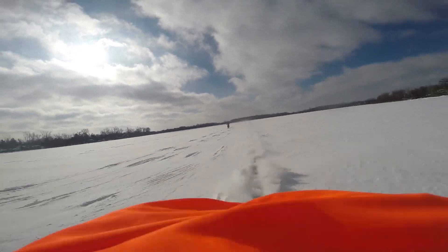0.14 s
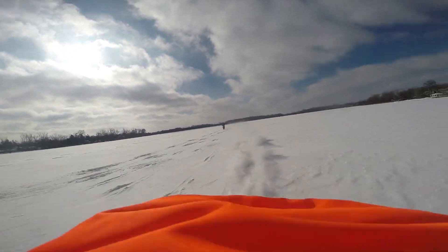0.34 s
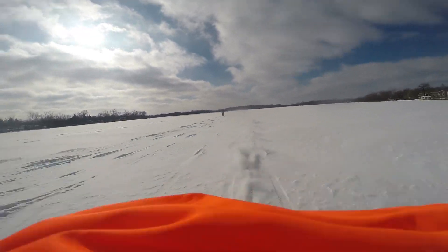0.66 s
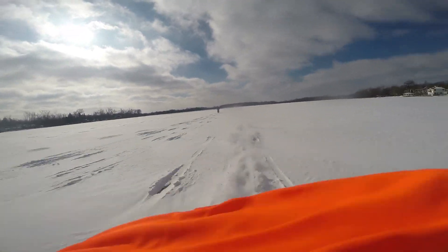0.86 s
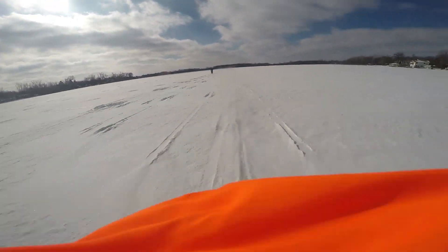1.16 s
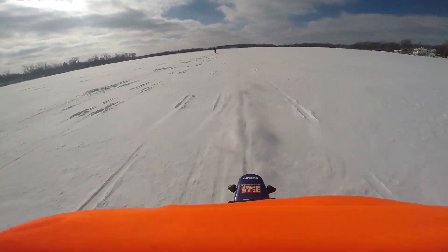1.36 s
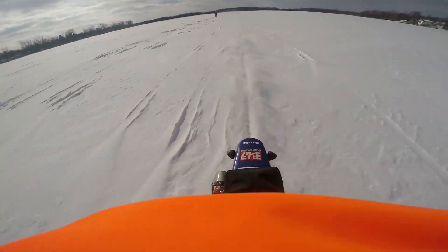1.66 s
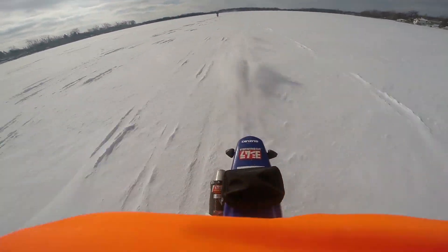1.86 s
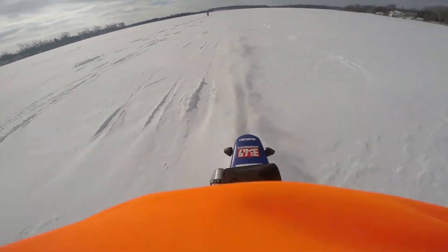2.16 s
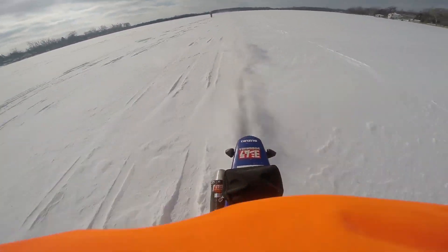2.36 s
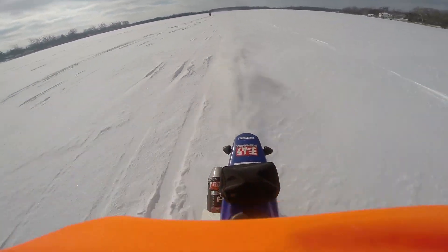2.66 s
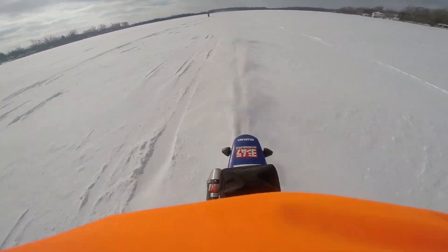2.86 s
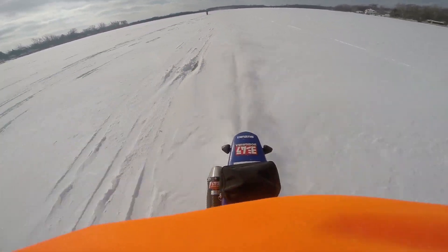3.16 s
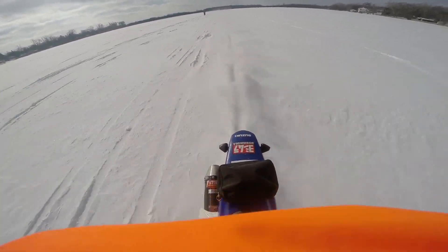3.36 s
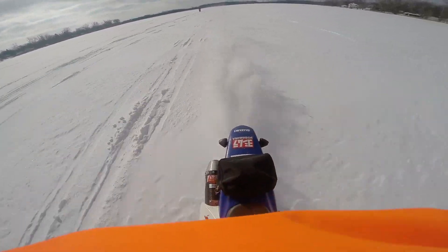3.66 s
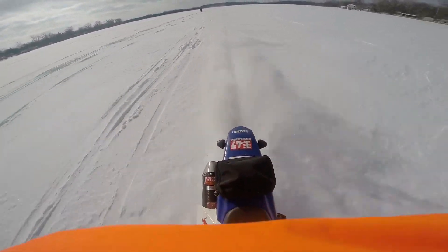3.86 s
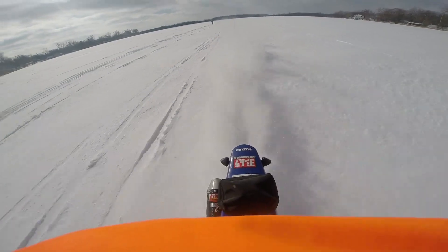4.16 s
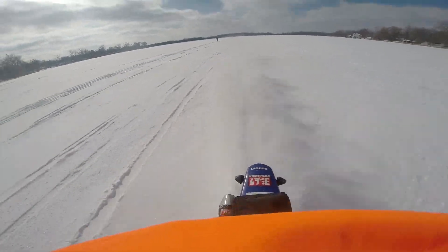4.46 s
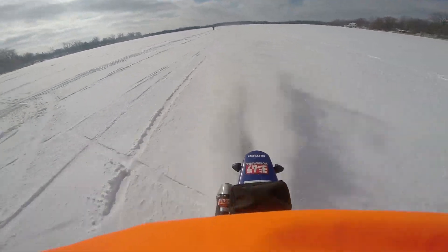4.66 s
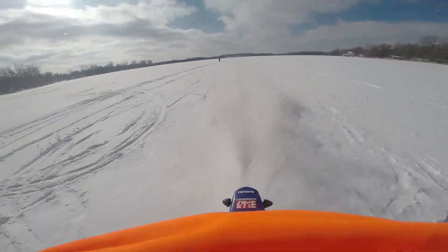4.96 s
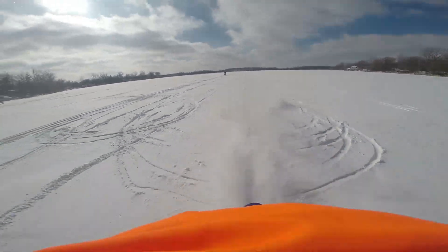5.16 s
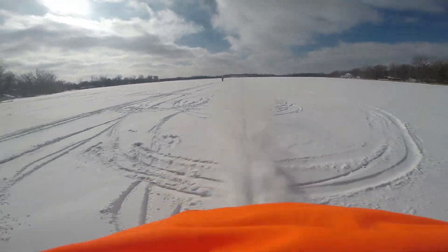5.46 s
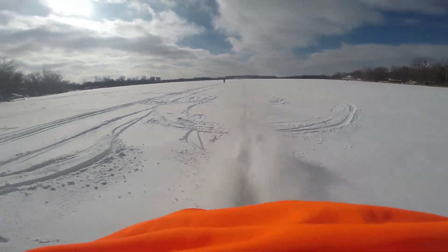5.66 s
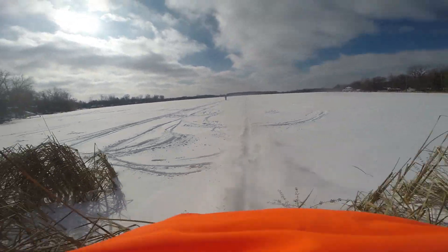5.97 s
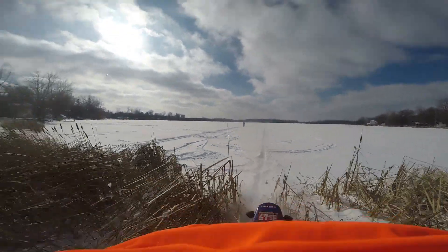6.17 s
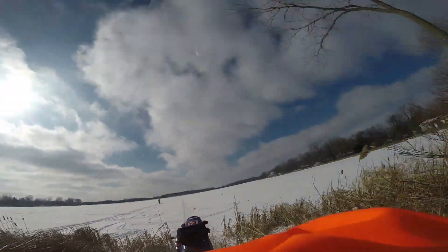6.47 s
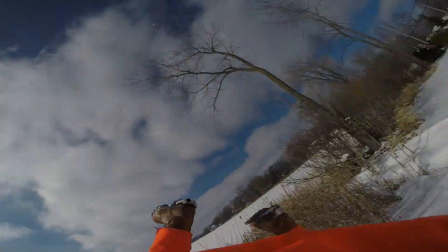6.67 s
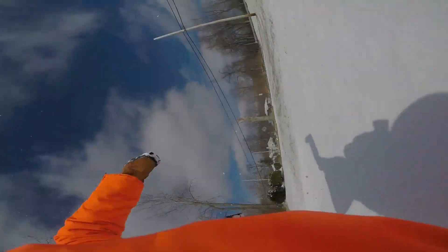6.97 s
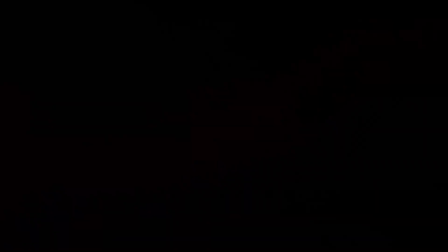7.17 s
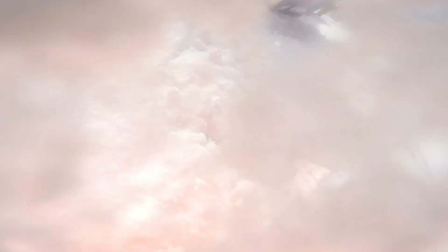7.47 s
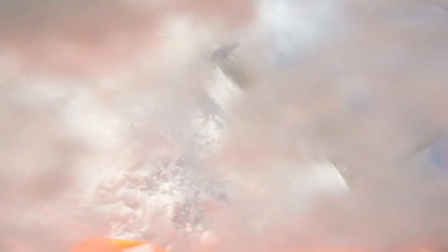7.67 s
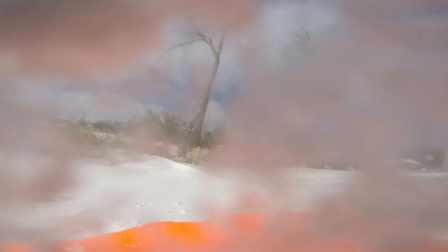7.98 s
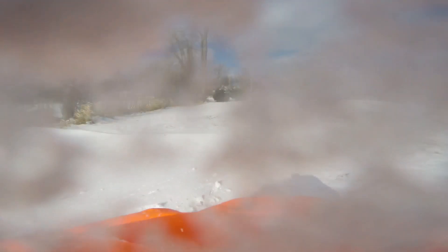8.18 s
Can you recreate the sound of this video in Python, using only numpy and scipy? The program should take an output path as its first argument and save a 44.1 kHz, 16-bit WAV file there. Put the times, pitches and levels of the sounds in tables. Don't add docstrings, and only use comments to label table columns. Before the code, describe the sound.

A small camera in a sealed plastic housing on a motorcyclist's back crosses a frozen lake. Loud low wind buffeting, jacket slaps and rubbing come first, then hollow plastic knocks. Wind fades as the bike slows, leaving cloth crunches and rumble. A muffled engine rev climbs briefly, then sharp clattering blows and a gritty snow scrape mark the fall, followed by quiet rustles and ticks.

```python
import sys
import numpy as np
from scipy import signal
from scipy.fft import rfft, irfft, next_fast_len
from scipy.io import wavfile

SR = 44100
rng = np.random.default_rng(int(sys.argv[2]) if len(sys.argv) > 2 else 0)


def dump_mix(stems):
    frames = np.atleast_2d(stems).T
    limited = np.clip(frames, -1, 1)
    pcm = np.round(limited * 32767).astype(np.int16)
    wavfile.write(sys.argv[1], SR, pcm)


def elevation(decibels):
    levels = np.asarray(decibels, float)
    return 10 ** (levels / 20)


N = 367217

# time_s, level_db
WIND = [(0.0, -20.5), (0.68, -16.5), (1.12, -21), (1.5, -13), (1.77, -20), (2.3, -14.5), (3.1, -17),
        (3.3, -19), (3.6, -26), (3.78, -28.5), (4.4, -34), (5.1, -36.5), (6.0, -43), (6.3, -28.5),
        (6.5, -43), (6.95, -40), (7.9, -61.5), (8.33, -54)]
# time_s, share
AIRSPEED = [
    (0, 1),
    (3.5, 0.92),
    (4.0, 0.45),
    (6.3, 0.79),
    (6.5, 0.04),
    (8.33, 0.72),
]
# frequency_hz, density_db (per Hz)
HEAVE = [(4.7, -42), (8.0, -4), (32, 2.5), (44, -9), (64, -18.5), (90, -17.5), (120, -53.5), (200, -120)]
# frequency_hz, density_db (per Hz)
BUFFET = [(24, -35), (40, -0.5), (139, 0.5), (165, 0), (258, -22), (300, -19), (390, -20.5), (660, -120)]
# frequency_hz, density_db (per Hz)
ROAR = [(180, 1), (240, 7), (300, 6), (380, 3), (480, -5.5), (600, -39)]
# mode_hz, width_hz, level_db
MOUNT = [(140, 110, 1.5), (238, 280, -8.5), (290, 105, 9.5), (352, 120, 3)]
# mode_hz, width_hz, level_db
HOLLOW = [(496, 99, 9.5), (800, 92, -17), (996, 250, 1), (850, 820, 4)]
# offset_db, slope (dB per wind dB), slope (dB per rub dB)
HEAVE_LAW = (-13, 0.52, 0.081)
ROAR_LAW = (-8.5, 0.42, 0.46)
HAZE_LAW = (-15, 0.43, 0.48)
# middle_s, length_s, level_db
SWAYS = [(3.5, 0.16, -25), (3.73, 0.17, -30), (4.06, 0.39, -29), (4.81, 0.52, -26), (5.15, 0.74, -32),
         (5.66, 0.54, -29), (6.12, 0.44, -26.5), (6.48, 0.17, -32.5), (6.95, 0.23, -28.5),
         (7.45, 0.17, -25.5), (7.65, 0.18, -36), (8.2, 0.3, -31.5)]
# middle_s, length_s, level_db, hum_db and boom_db relative to it
THUDS = [(1.23, 0.12, -31, -12, -24), (1.56, 0.15, -33.5, 5.5, -76), (3.6, 0.19, -42.5, -11, 12),
         (4.1, 0.84, -42.5, -5, -2), (4.7, 1, -54.5, -6, 3), (3.05, 0.4, -24.5, -18, -22),
         (5.46, 0.037, -39, 7, -2), (6.3, 0.2, -51, 18, 5), (6.42, 0.047, -27, 5, -9),
         (6.72, 0.049, -42.5, 11.5, -28), (7.03, 0.13, -28.5, 2, -32), (7.1, 0.081, -38, 10.5, -14),
         (7.27, 0.17, -29, -5.5, -8.5), (7.45, 0.15, -30.5, -6.5, -14), (7.65, 0.13, -52.5, -2, -60),
         (8.15, 0.42, -50, 4.5, -18)]
# start_s, peak_db, pitch_hz
JOLTS = [(0.028, 3, 134), (0.092, -1, 112), (0.585, 3.5, 76), (0.709, 4, 130), (0.915, 2.5, 147),
         (0.967, 0, 145), (1.497, 6, 120), (1.754, 6.5, 131.5), (1.799, -0.5, 133), (1.846, 0.5, 140),
         (1.956, 0, 142), (2.188, -3, 135), (2.388, 3, 156), (2.515, -1.5, 178), (2.625, -20, 109),
         (2.699, 4, 140), (3.323, -6, 140), (3.411, -2, 135), (3.509, 0.5, 133), (3.722, -6, 140),
         (5.094, -16, 123), (5.455, -14.5, 140), (6.206, -7, 95), (6.405, -13, 101), (7.028, -11, 264),
         (7.044, -20, 300), (7.09, -22, 328), (7.115, -14, 290), (7.451, -21, 186), (7.149, -7, 151),
         (7.239, -36, 111), (7.435, -14.5, 71.6), (7.621, -25, 125), (8.114, -18.5, 118)]
# middle_s, pressure (share of full scale), width_s
SHOVES = [
    (5.023, -0.19, 0.0033),
    (5.155, -0.36, 0.0041),
    (5.17, 0.2, 0.011),
    (8.153, 0.073, 0.0044),
    (8.219, 0.077, 0.013),
]
# start_s, peak_db, length_s
FLAPS = [(0.004, -10.5, 0.027), (0.1082, -21, 0.038), (0.183, -14, 0.023), (0.247, -38, 0.026),
         (0.255, -19, 0.024), (0.284, -26, 0.13), (0.385, -18, 0.04), (0.4509, -24, 0.04),
         (0.48, -18, 0.034), (0.546, -24, 0.027), (0.558, -14, 0.026), (0.667, -8, 0.041),
         (0.707, -13, 0.026), (0.732, -15, 0.04), (0.752, -19, 0.06), (0.827, -20, 0.029),
         (0.861, -16, 0.019), (0.895, -10.5, 0.049), (0.924, -28, 0.028), (0.977, -9, 0.072),
         (1.037, -16.5, 0.16), (1.142, -10, 0.029), (1.202, -7.5, 0.026), (1.246, -12.5, 0.03),
         (1.299, -14, 0.036), (1.314, -15, 0.024), (1.353, -9, 0.021), (1.404, -11.5, 0.033),
         (1.424, -13.5, 0.022), (1.448, -9, 0.016), (1.47, -30, 0.028), (1.49, -15, 0.045),
         (1.524, -26, 0.027), (1.56, -13.5, 0.059)]
# time_s, level_db
RUB = [(0.0, -26.5), (0.8, -20.5), (1.2, -29.5), (1.58, -41.5), (1.66, -46), (2.1, -41.5), (2.28, -39),
       (2.5, -43), (3.93, -44), (4.02, -47), (4.63, -51), (5.22, -43), (5.3, -48), (6.0, -50), (6.55, -49),
       (7.1, -43.5), (7.55, -55), (8.33, -54.5)]
# frequency_hz, density_db (per Hz)
CAVITY = [(700, -13), (800, -9), (1180, -3), (1300, -0.5), (1410, 1.5), (1800, -0.5), (2180, 4),
          (2400, -0.5), (3300, -9), (4200, -27), (5000, -64)]
# frequency_hz, density_db (per Hz)
CRISP = [(2470, -9.5), (4200, -7), (4650, -2.5), (5140, -8), (5910, -0.5), (7860, -14), (9890, -14.5),
         (12800, -20), (15200, -32), (15700, -65), (16000, -99)]
# offset_db above the cavity, slope (dB per rub dB)
CRISP_LAW = (-21.5, -0.21)
# mode_hz, width_hz, level_db
RUB_LATCH = [(1560, 300, 0), (2200, 200, 6)]
# middle_s, length_s, level_db, crispness_db
STROKES = [(2.74, 0.51, -50, -16), (3.34, 0.16, -44, -12), (3.47, 0.069, -33, -35),
           (3.565, 0.064, -41.5, -10.5), (3.62, 0.15, -46, 3), (5.98, 0.2, -58, 9), (5.0, 0.67, -76, 21),
           (5.76, 0.24, -67, 0), (6.16, 0.44, -38.5, -6.5), (6.29, 0.19, -44, -8.5), (6.36, 0.2, -44.5, -6),
           (7.27, 0.21, -29, -7), (7.44, 0.23, -43, -3.5), (7.64, 0.28, -69, -7), (8.05, 0.15, -45, -9),
           (8.125, 0.093, -36, -7), (8.19, 0.064, -40, -8.5), (8.24, 0.076, -57, -5),
           (3.73, 0.057, -38.5, -13.5)]
# start_s, length_s, level_db, crispness_db
SLIDES = [(6.397, 0.037, -28.5, -20),(7.001, 0.058, -35, -14), (7.189, 0.014, -19, -1.5),
          (7.2, 0.0082, -10, -5), (7.201, 0.025, -26, -9), (7.231, 0.069, -23.5, -9.5),
          (7.282, 0.052, -31.5, -27), (6.256, 0.043, -39, -33), (7.076, 0.061, -37.5, -18),
          (6.313, 0.029, -51, -18), (6.407, 0.0056, -33, -23), (7.395, 0.09, -42, 1),
          (7.607, 0.035, -46, -6)]
# start_s, peak_db, centre_hz, length_s
CRUNCHES = [(2.552, -23, 1550, 0.037), (2.612, -29, 1350, 0.088), (2.708, -22.5, 1660, 0.044),
            (2.815, -27, 2260, 0.068), (2.841, -34, 1390, 0.033), (2.991, -37, 800, 0.023),
            (3.036, -26, 910, 0.027), (3.193, -21, 1380, 0.046), (3.23, -38, 1560, 0.02),
            (3.343, -40, 1750, 0.058), (3.355, -25.5, 1450, 0.027), (3.446, -25.5, 1400, 0.052),
            (3.074, -32, 1070, 0.043), (3.554, -35, 640, .022), (3.589, -26, 520, 0.019),
            (3.619, -30, 600, .03), (3.815, -22, 1400, 0.026), (3.866, -23, 1370, 0.034),
            (3.937, -20.5, 1340, 0.018), (3.9594, -24, 1550, 0.033), (4.859, -28.5, 2230, 0.022),
            (4.923, -22, 1820, 0.019), (4.983, -27, 2200, 0.015), (5.045, -25.5, 2060, 0.036),
            (5.112, -21, 2230, 0.037), (5.187, -30, 1910, 0.024), (5.24, -28, 1710, 0.033)]
# start_s, peak_db, crack_db
KNOCKS = [(0.6753, -19, -31), (0.8977, -27, -11), (1.1946, -12, -37), (1.2509, -15, -39),
          (1.4274, -18, -34), (1.4526, -18, -36), (1.472, -15, -24), (1.562, -9.5, -44), (1.577, -15, -45),
          (1.622, -14.5, -64), (1.669, -14, -50), (1.714, -10.5, -53), (1.7824, -12, -22.5),
          (1.8222, -14.5, -46), (1.8696, -9.5, -53), (1.9336, -14.5, -22), (1.9757, -7, -29),
          (2.0932, -6, -51), (2.122, -26, -44), (2.256, -7.5, -18), (2.2892, -14, -48), (2.3093, -9.5, -25),
          (2.4162, -10, -22), (2.447, -22, -51), (3.688, -31, -27), (5.125, -11.5, -26), (5.1806, -23, -30),
          (5.3374, -22.5, -30.5), (5.7388, -27.5, -51)]
# start_s, peak_db, loudest_mode_hz, crack_db, frame_ring_db
BLOWS = [(0.937, -7, 1130, -38, -6), (6.119, -17, 2000, -56, -12), (6.156, -19, 1630, -44, 9),
         (6.2146, -9, 1740, -36, 6.5), (6.315, 0.5, 1420, -22, -5), (6.36, -24, 1550, -54, -6),
         (6.4152, 1.5, 1946, -34, -4.5), (6.4151, -1.5, 3220, -47, -22), (6.465, -25, 2280, -45, -3),
         (6.7058, -6.5, 2030, -37, -5.5), (6.7164, -8.5, 1880, -38, -12.5), (6.985, -9, 1740, -34, -27),
         (7.038, 1.5, 2144, -25, -4.5), (7.109, -15.5, 2200, -46, 2), (7.1553, 5, 2220, -19, -9.5),
         (7.2033, 4.5, 2510, -1, -6.5), (7.4356, -6.5, 2740, -31, -23), (7.435, -1.5, 1940, -43, -11.5),
         (7.633, -18, 2340, -33, -10.5), (8.1126, -22.5, 2120, -38, -1), (8.128, -16.5, 2060, -36, -7),
         (8.179, -26, 1790, -72, -19)]
# start_s, peak_db
TICKS = [(2.485, -42), (2.512, -47), (3.13, -42), (3.831, -46), (4.03, -35), (4.973, -34), (5.3202, -38),
         (5.3487, -24.5), (5.447, -33), (5.75, -28.5), (5.795, -39), (5.811, -28.5), (5.844, -38),
         (6.2687, -38), (6.777, -39), (7.101, -30), (7.166, -30), (7.46, -36), (7.5289, -30), (7.55, -38),
         (7.809, -38), (7.886, -30.5)]
# mode_hz, width_hz, level_db
SHELL = [(1220, 610, -0.5), (1550, 220, 10.5), (2236, 310, 10.5), (3350, 240, 1), (3240, 2200, -5)]
# mode_hz, level_db, t60_s
FRAME = [(315, 17, 0.034), (417, 1, 0.048), (809, -0.5, 0.053), (1000, -4, 0.041), (1223, -7, 0.066),
         (1550, 1, 0.05), (2000, -5, .08)]
# mode_hz, level_db under the hit, t60_s
LATCH = [(2169, -20, .12), (2240, -31, .05)]
# mode_hz, level_db under the blow, t60_s
LENS = [(3056, -12.5, 0.012), (4670, -24.5, 0.0089), (6300, -19, 0.0068)]
# time_s, rate_hz (firings per second)
REVS = [
    (5.657, 14),
    (5.822, 17.2),
    (5.982, 27.5),
    (6.175, 43.4),
    (6.4, 48),
]
# time_s, peak_db, tuning (factor)
THROTTLE = [
    (5.655, -31, 0.84),
    (5.8, -25.5, 0.9),
    (5.9, -18.5, 0.85),
    (6.0, -21, 1.07),
    (6.13, -16.5, 1.02),
    (6.29, -23.5, 0.96),
    (6.4, -36, 1.7),
]
# mode_hz, level_db, t60_s
PIPE = [(135, 9, 0.035), (267, 18.5, 0.034), (415, 14, 0.036), (500, 6, .035), (776, -14, 0.027)]
# start_s, peak_db, centre_hz
PRICKS = [(3.76, -46, 5780), (4.5545, -51, 5980), (4.5895, -47, 6440), (5.314, -35.5, 6150),
          (6.3324, -42, 6150), (6.5026, -58, 5810), (6.559, -48, 5850), (6.595, -53, 5370),
          (6.6423, -55, 6320), (6.6727, -54, 5690), (7.3975, -32, 5520), (7.5634, -48, 5500),
          (7.6214, -46, 5730), (7.8466, -48, 6440), (8.109, -36, 5900),
          (2.9417, -52, 9260), (4.6728, -52, 10100), (4.8554, -55, 11600), (4.8673, -42, 10300),
               (5.009, -44, 11400), (5.2699, -48, 10100), (5.4156, -56, 9270), (5.7379, -44, 12900),
               (5.8082, -36, 11500), (5.8426, -47, 9340), (6.3759, -45, 9280), (7.664, -50, 9560),
               (7.9853, -53, 9900), (8.0072, -48, 9670), (8.0815, -55, 9380), (8.1723, -47, 9910),
               (8.298, -55, 12000)]


def wind():
    wind_db, rub_db = curve(WIND), curve(RUB)
    heaving, roaring, hazing = (elevation(offset_db + per_wind * wind_db + per_rub * rub_db)
                                for offset_db, per_wind, per_rub in (HEAVE_LAW, ROAR_LAW, HAZE_LAW))
    thud, thud_hum, thud_boom = swells(THUDS)
    speed = np.clip(curve(AIRSPEED), 0, 1)
    gusts = lumps(hz=25.2, depth_db=2.0)
    noise = evened(rng.standard_normal(N) * gusts)
    pulses = evened(sparse(per_s=130, spread_db=2.5) * gusts)
    eddies = (0.56 * noise - 0.75 * speed * pulses) / np.hypot(0.6, 0.53 * speed)

    heave = coloured(rng.standard_normal(N), HEAVE)
    buffet = coloured(eddies, BUFFET)
    hum = evened(low_pass(ring(noise, MOUNT), hz=500))
    fast_roar = coloured(eddies * lumps(hz=56.7, depth_db=-3.0), ROAR)
    roar = np.sqrt(speed) * fast_roar + np.sqrt(1 - speed) * hum
    haze = evened(low_pass(ring(noise * lumps(hz=70.5, depth_db=2.0), HOLLOW), hz=1160))
    low = (heaving + swells(SWAYS)[0]) * heave + (elevation(wind_db - 1.0) + thud) * buffet
    return low + (roaring + thud_hum) * roar + (hazing + thud_boom) * haze


def jolts():
    out, t = np.zeros(N), np.arange(8000) / SR
    shape = (1 - np.exp(-t / 0.0051)) * elevation(-60 * t / 0.052)
    for s, peak_db, hz in JOLTS:
        add(out, s, peaked(-shape * np.sin(2 * np.pi * hz * t), peak_db - 8.5))
    clock = np.arange(N) / SR
    for s, push, width in SHOVES:
        out += push * np.exp(-0.5 * ((clock - s) / width) ** 2)
    return out


def slaps(body, crisp):
    gain, t = np.zeros(N), np.arange(4000) / SR
    rise_s, level_db, crisp_db = 0.0007, -13.5, -14
    for s, peak_db, length in FLAPS:
        decay = elevation(peak_db + level_db - 20 * t / length)
        add(gain, s - rise_s, np.minimum(t / rise_s, 1) * decay)
    return gain * (body + elevation(crisp_db) * crisp)


def rustle(body, crisp):
    steady_db, speed = curve(RUB), curve(AIRSPEED)
    stroke, stroke_crisp = swells(STROKES)
    rub = elevation(steady_db) + stroke
    offset_db, per_rub = CRISP_LAW
    thin = elevation(steady_db + offset_db + per_rub * steady_db) + stroke_crisp
    rub_db, crisp_db = 20 * np.log10(rub), 20 * np.log10(thin / rub)

    loose = np.clip((-22 - rub_db) / 16, 0.2, 1)
    latch_ring = 0.8 * loose ** 2 * evened(ring(body, RUB_LATCH))
    flap = lumps(hz=24.2, depth_db=6.0) * lumps(hz=156, depth_db=-4.5)
    flap = flap ** (loose * (0.5 + 0.5 * speed))
    flapping_body = body * flap ** 0.83
    flapping_crisp = crisp * flap ** 0.51 * lumps(hz=40.7, depth_db=2.5)

    bright = elevation(np.clip(0.5 * (rub_db + crisp_db + 40), -16, 0))
    soft = low_pass(flapping_crisp, hz=6900)
    treble = elevation(crisp_db + 2.5) * (bright * flapping_crisp + (1 - bright) * soft)
    out = elevation(rub_db - 0.78) * (0.71 * flapping_body + latch_ring * flap ** 0.036 + treble)

    for s, length, db, slide_crisp_db in SLIDES:
        at = slice(round(s * SR), round((s + length) * SR))
        scrape = body[at] + elevation(slide_crisp_db) * crisp[at]
        out[at] += elevation(db) * scrape * signal.windows.tukey(len(out[at]), 0.35)
    for s, peak_db, hz, length in CRUNCHES:
        part = flapping_body[round(s * SR):][:round(length * SR)]
        fold = evened(ring(rng.standard_normal(len(part)), [(hz, 0.28 * hz, 0), (3300, 600, -12)]))
        crackle = part + 0.34 * soft[round(s * SR):][:len(part)]
        crunch = min(hz / 1500, 1) ** 2 * crackle + low_pass(fold, hz=4500)
        add(out, s - 0.002, peaked(crunch * signal.windows.tukey(len(part), 0.4), peak_db - 1.5))

    hiss = coloured(rng.standard_normal(N) * lumps(hz=30, depth_db=1.5), CRISP)
    blown = low_pass(low_pass(hiss, hz=7200), hz=7200)
    return out + elevation(-63) * hiss + elevation(-45.5 + 0.47 * curve(WIND)) * speed * blown


def friction():
    clicks = sparse(per_s=1500, spread_db=6) * rng.choice([-1, 1], N)
    grit = evened(rng.standard_normal(N)) + 0.58 * evened(clicks)
    body, fold = coloured(grit, CAVITY), lumps(hz=14.2, depth_db=2.5)
    low = signal.sosfiltfilt(signal.butter(N=3, Wn=1800, fs=SR, output="sos"), body)
    return evened(low * fold + (body - low) / fold), coloured(grit, CRISP)


def knocks():
    out, t = np.zeros(N), np.arange(4000) / SR
    for (s, peak_db, crack_db), z in zip(KNOCKS, rng.standard_normal((len(KNOCKS), 4000))):
        shell = [(hz * (1 + 0.04 * a), width, db + 2.5 * b)
                 for (hz, width, db), a, b in zip(SHELL, z[3:], z[9:])]
        lens = np.minimum(t / 0.001, 1) * struck(LENS, t, 1 + 0.03 * z[2])
        knock = hit(z, peak_db, crack_db, 0.018, shell, -6)
        add(out, s - 0.0005, knock + elevation(peak_db - 3 + 4 * z[1]) * lens)

    for (s, peak_db, hz, crack_db, frame_db), z in zip(BLOWS, rng.standard_normal((len(BLOWS), 4000))):
        off_db = -16 * abs(np.log2(hz / 2200))
        frame_modes = [(f, db + 3 * a, t60) for (f, db, t60), a in zip(FRAME, z[3:])]
        frame = peaked(np.minimum(t / 0.0012, 1) * struck(frame_modes, t), peak_db + frame_db - 5.0)
        lens = elevation(peak_db) * np.minimum(t / 0.0024, 1) * struck(LENS, t)
        shell = [(f, width, db - 16.0 + off_db) for f, width, db in SHELL] + [(hz, 0.24 * hz, 12)]
        grind_s = 0.06 * elevation(0.2 * crack_db)
        add(out, s - 0.0005, hit(z, peak_db, crack_db, grind_s, shell, off_db - 1) + frame + lens)

    for (s, peak_db), z in zip(TICKS, rng.standard_normal((len(TICKS), 400))):
        add(out, s, peaked(coloured(z * elevation(-60 * t[:400] / 0.0087), CRISP), peak_db))
    return out


def hit(z, peak_db, crack_db, t60, modes, latch_db=0):
    t = np.arange(len(z)) / SR
    loudest_hz = max(modes, key=lambda mode: mode[2])[0]
    grind = 0.2 * z * elevation(-60 * t / max(t60, 0.002))
    first_touch = 2 * (t == 0)
    full_contact = 2.5 * (abs(t - 1.5 / loudest_hz) < 0.5 / SR)
    blow = grind + first_touch - full_contact
    push = np.convolve(blow, np.hanning(9))[:len(z)]
    crack = coloured(blow * elevation(-60 * t / 0.02), CRISP)
    shell = peaked(low_pass(ring(push, modes), hz=5250), 0)
    latch = elevation(latch_db + 2 * z[0]) * struck(LATCH, t)
    return elevation(peak_db - 2.0) * (shell + latch) + peaked(crack, crack_db - 0.5)


def engine():
    out, t = np.zeros(N), np.arange(3000) / SR
    s = np.arange(REVS[0][0], REVS[-1][0], 1 / SR)
    count = np.cumsum(np.interp(s, *np.transpose(REVS))) / SR
    when, peak_db, tune = np.transpose(THROTTLE)
    for at in np.interp(np.arange(int(count[-1]) + 1), count, s):
        tuning = np.interp(at, when, tune) * (1 + 0.008 * rng.standard_normal())
        rough = 1 + 0.077 * evened(low_pass(rng.standard_normal(3000), hz=300))
        pop = low_pass(np.minimum(t / 0.0012, 1) * struck(PIPE, t, tuning) * rough, hz=770)
        pop = pop + 0.084 * np.roll(pop, round(0.0065 * SR))
        add(out, at, peaked(pop, np.interp(at, when, peak_db) + rng.normal(0, 1.2)))
    return out


def pricks():
    out, t = np.zeros(N), np.arange(200) / SR
    grains = PRICKS
    envelope = elevation(-60 * t / 0.004) * np.minimum(t / 0.00038, 1)
    for (s, peak_db, hz), z in zip(grains, rng.standard_normal((len(grains), 200))):
        grain = ring(z * envelope, [(hz, 0.25 * hz, 0)])
        add(out, s, peaked(np.diff(grain), peak_db + 10.0))
    return out


def ring(x, modes):
    out = np.zeros(len(x))
    for k, (hz, width, db) in enumerate(modes):
        r = np.exp(-np.pi * width / SR)
        poles = [1, -2 * r * np.cos(2 * np.pi * hz / SR), r * r]
        out += (-1) ** k * elevation(db) * signal.lfilter([1, -1], poles, x) * (1 - r)
    return out


def struck(modes, t, tune=1):
    return sum(elevation(db - 60 * t / t60) * np.sin(2 * np.pi * hz * tune * t) for hz, db, t60 in modes)


def coloured(x, points):
    size = next_fast_len(len(x))
    f, db = np.transpose(points)
    hz = np.fft.rfftfreq(size, 1 / SR)
    gain = elevation(np.interp(np.log(hz + 1), np.log(f + 1), db, -120, -120))
    return evened(irfft(rfft(x, size) * gain, size)[:len(x)])


def low_pass(x, hz):
    return signal.sosfilt(signal.butter(N=4, Wn=min(hz, SR / 2.2), fs=SR, output="sos"), x)


def lumps(hz, depth_db):
    slow = signal.lfilter(*signal.butter(N=2, Wn=hz, fs=SR), rng.standard_normal(N + SR))[SR:]
    return elevation(depth_db * evened(slow))


def sparse(per_s, spread_db):
    size = elevation(spread_db * np.minimum(rng.exponential(1, N), 3))
    return size * (rng.random(N) < per_s / SR)


def swells(rows):
    out = np.zeros((len(rows[0]) - 2, N))
    for middle, length, db, *more_db in rows:
        bump = np.hanning(round(length * SR))
        for gain, extra_db in zip(out, [0, *more_db]):
            add(gain, middle - length / 2, elevation(db + extra_db) * bump)
    return out


def curve(rows):
    s, value = np.transpose(rows)
    return np.interp(np.arange(N) / SR, s, value)


def evened(x):
    return x / np.sqrt(np.mean(x ** 2) + 1e-20)


def peaked(x, db):
    return elevation(db) * x / abs(x).max()


def add(mix, s, sound):
    part = mix[round(s * SR):][:len(sound)]
    part += sound[:len(part)]


def scene():
    body, crisp = friction()
    moving_air = wind() + jolts()
    cloth_and_snow = slaps(body, crisp) + rustle(body, crisp)
    return (moving_air + cloth_and_snow + knocks() + engine() + pricks())[None]


def roll_off(x):
    return signal.sosfilt(signal.butter(12, 16490, fs=SR, output="sos"), x)


def record(dry):
    loud = 1.056 * np.tanh(np.clip(dry, -1.6, 1.6) / 1.137)
    mix = signal.oaconvolve(loud, signal.firwin(255, 15700, fs=SR)[None], "same")
    return roll_off(mix)


dry = scene()
out = record(dry)
dump_mix(out)
```